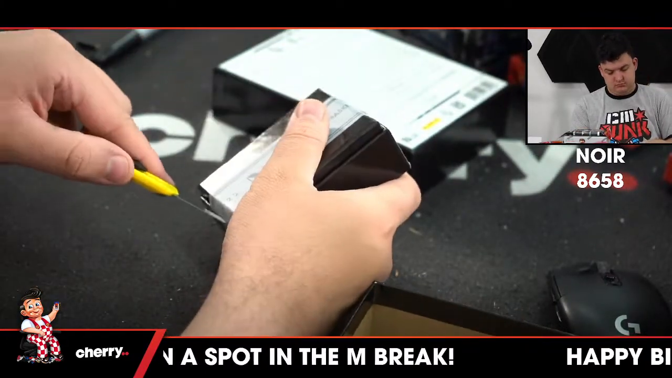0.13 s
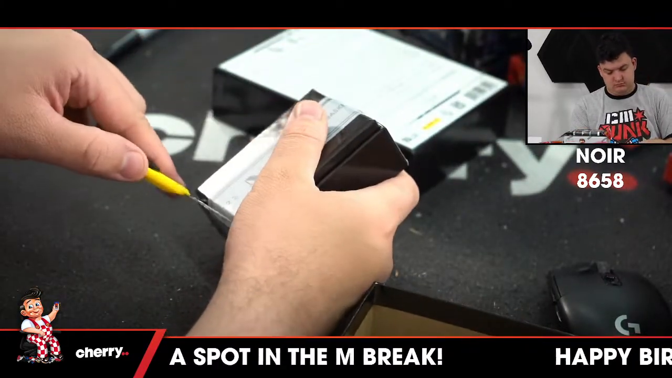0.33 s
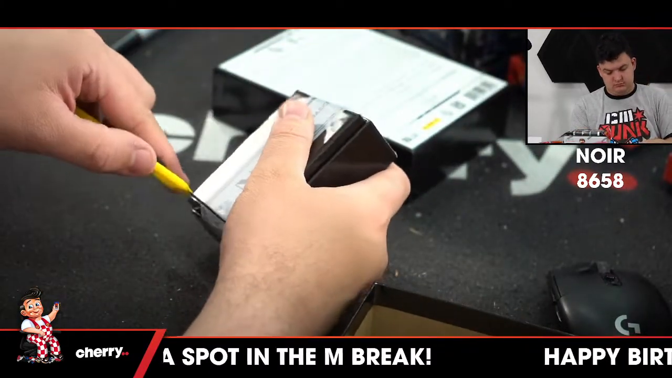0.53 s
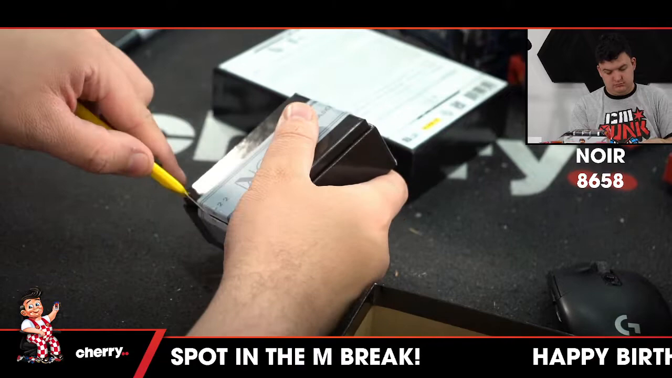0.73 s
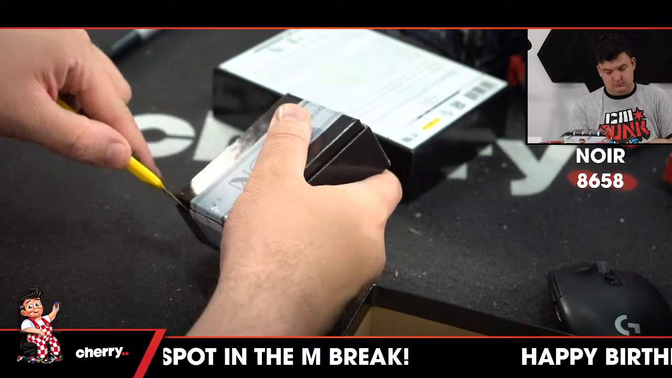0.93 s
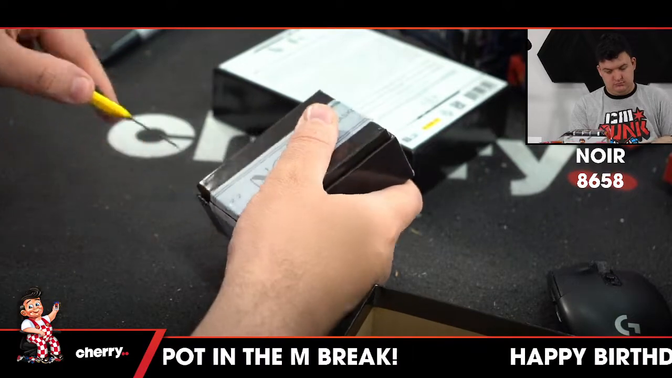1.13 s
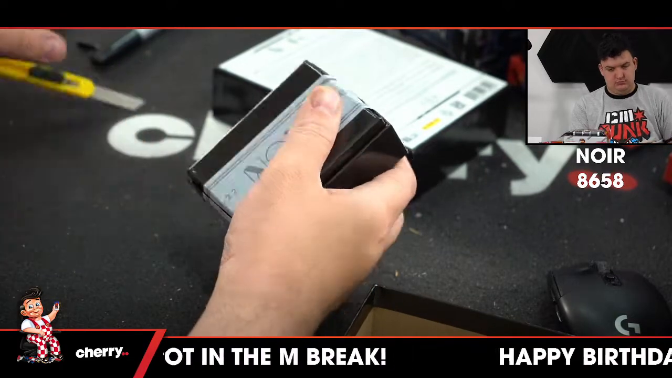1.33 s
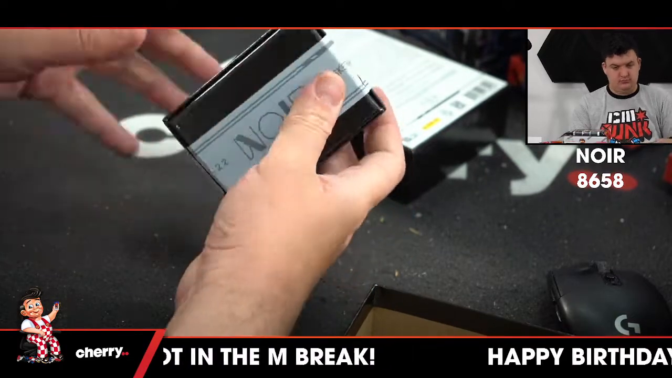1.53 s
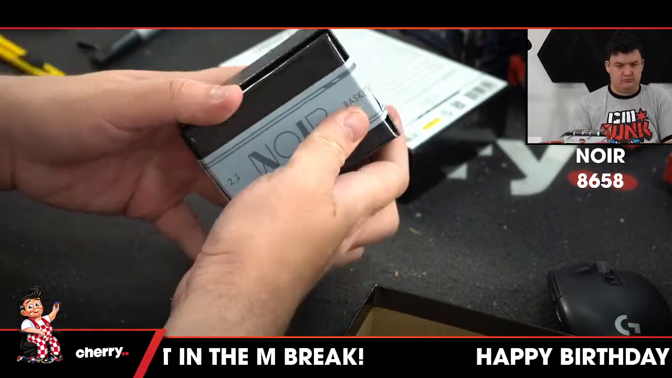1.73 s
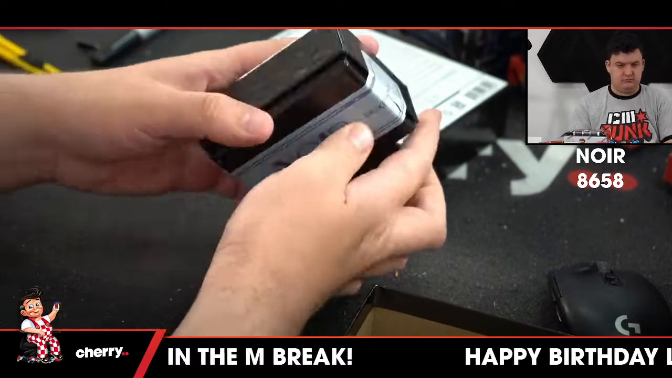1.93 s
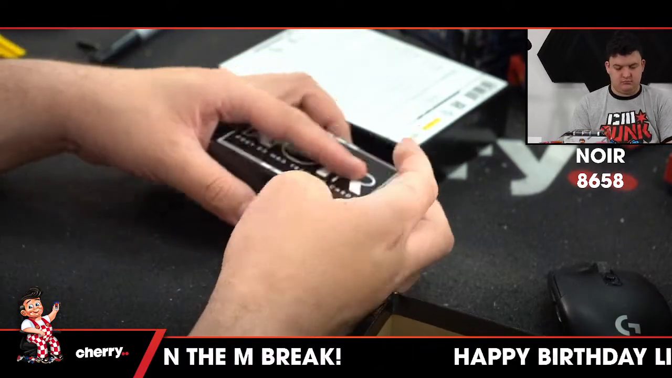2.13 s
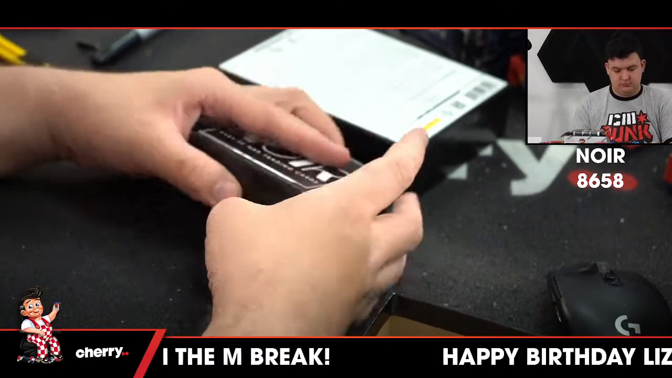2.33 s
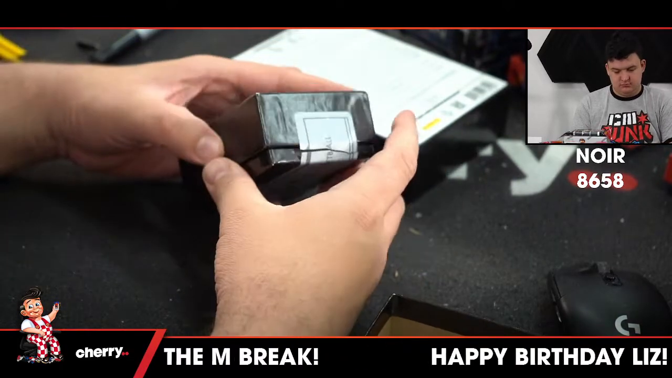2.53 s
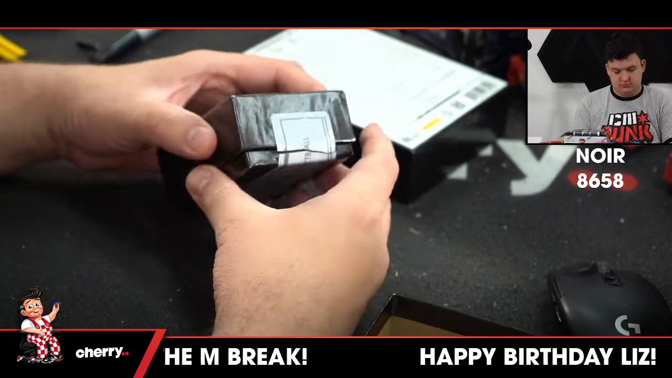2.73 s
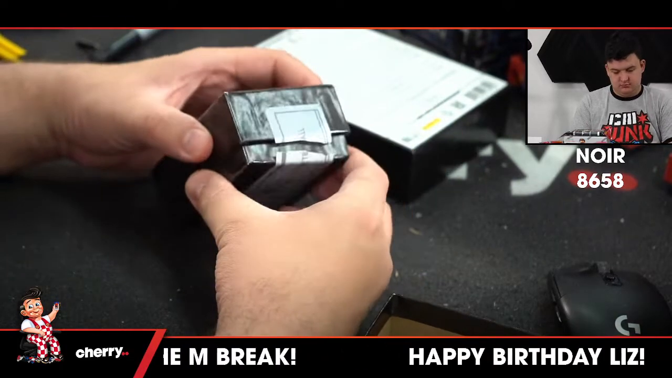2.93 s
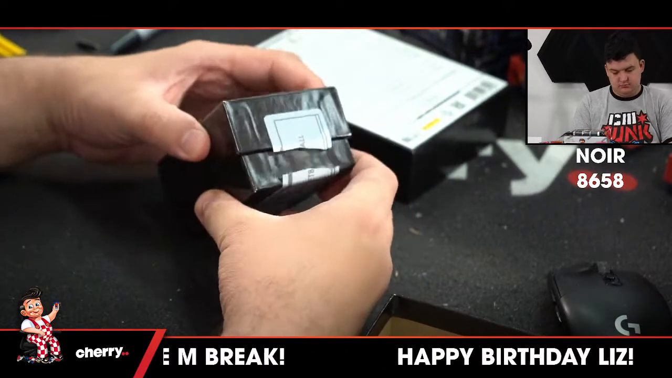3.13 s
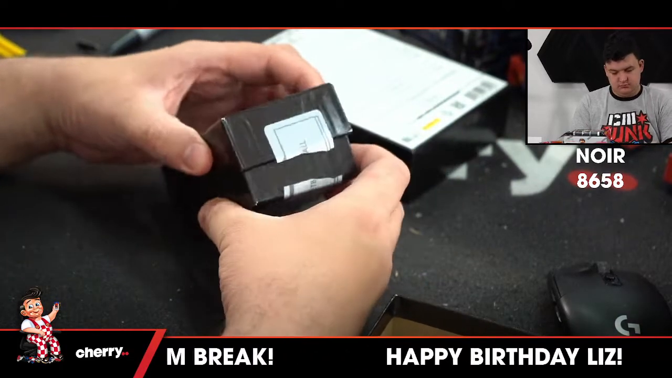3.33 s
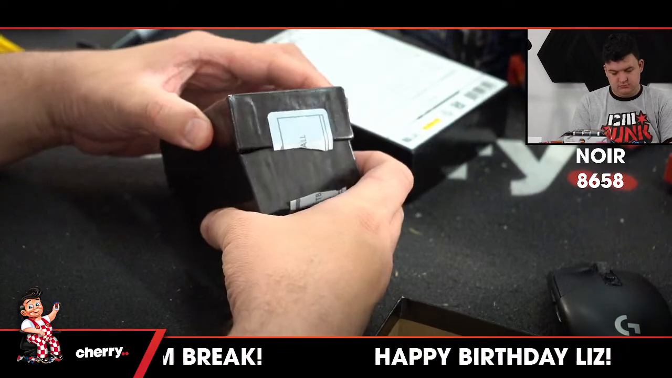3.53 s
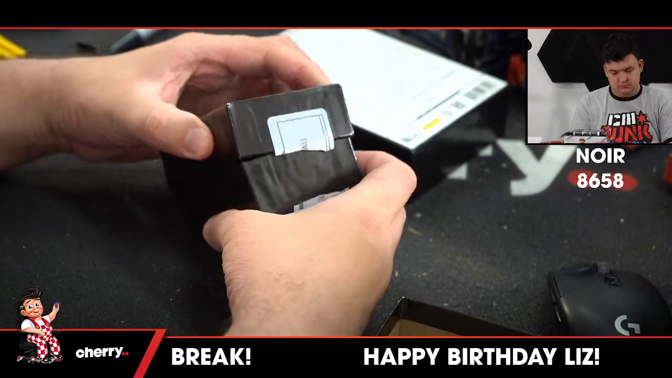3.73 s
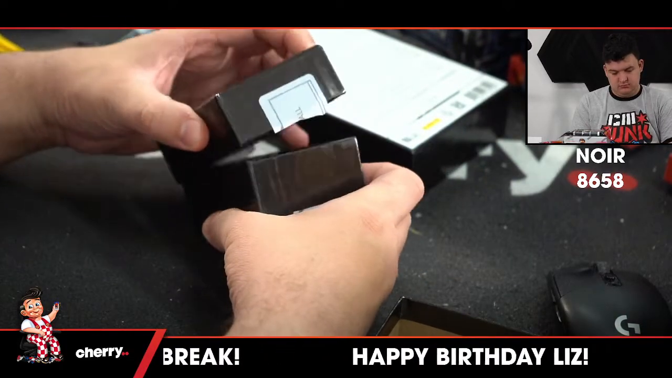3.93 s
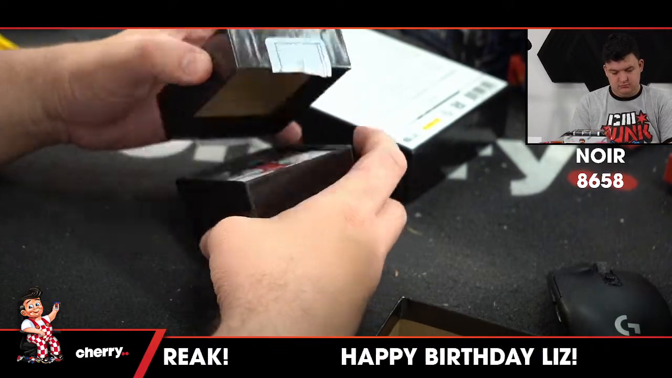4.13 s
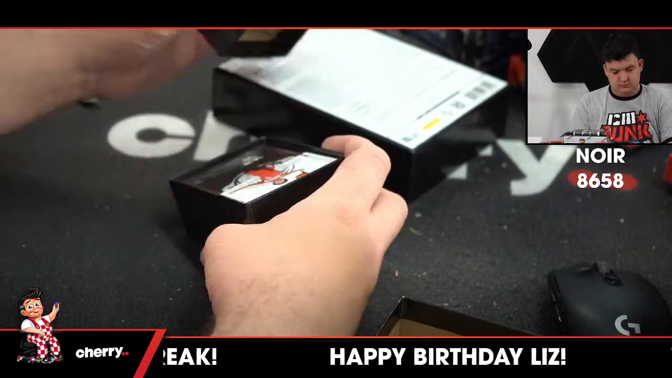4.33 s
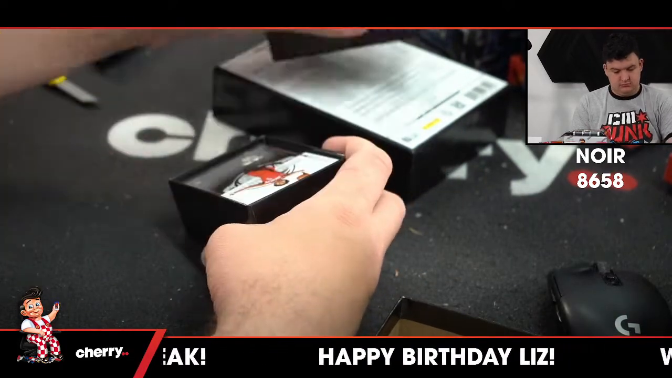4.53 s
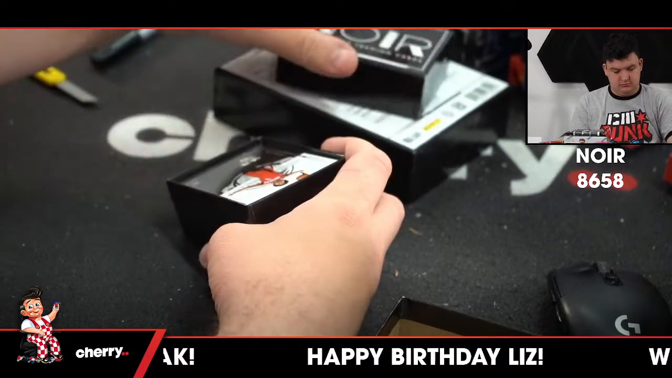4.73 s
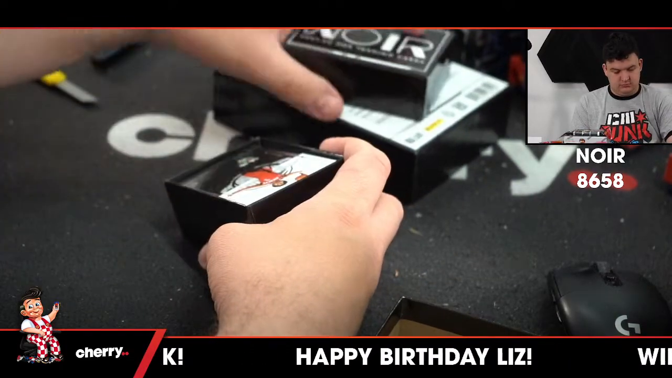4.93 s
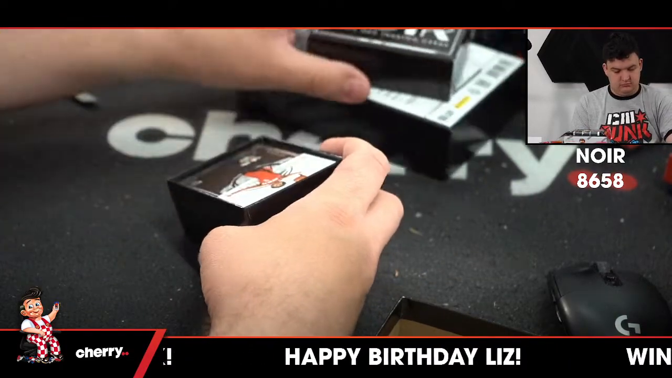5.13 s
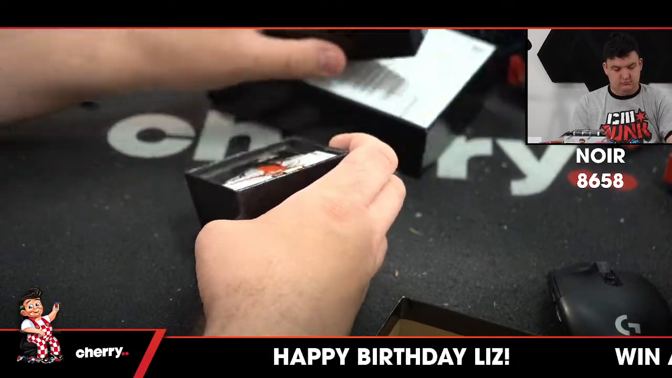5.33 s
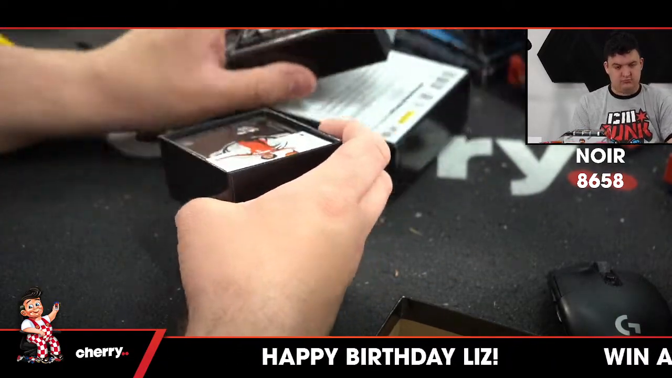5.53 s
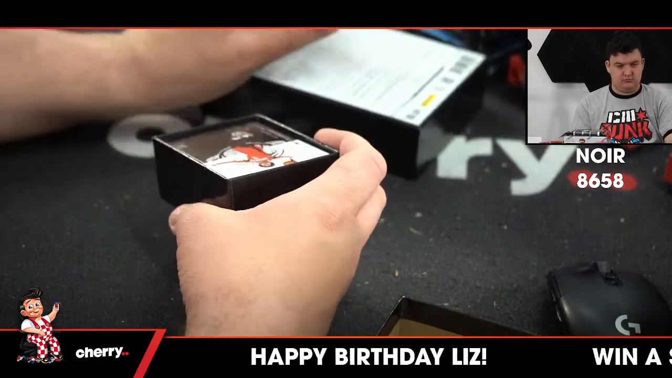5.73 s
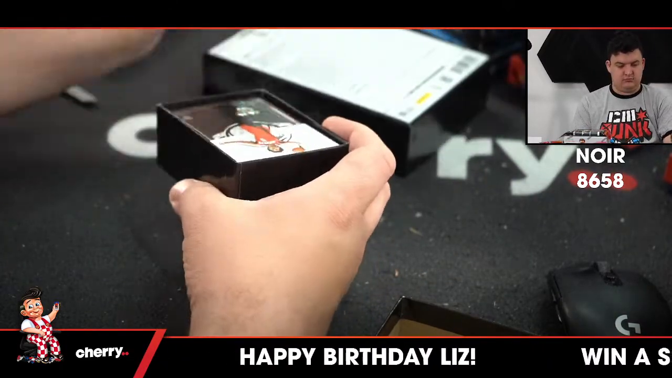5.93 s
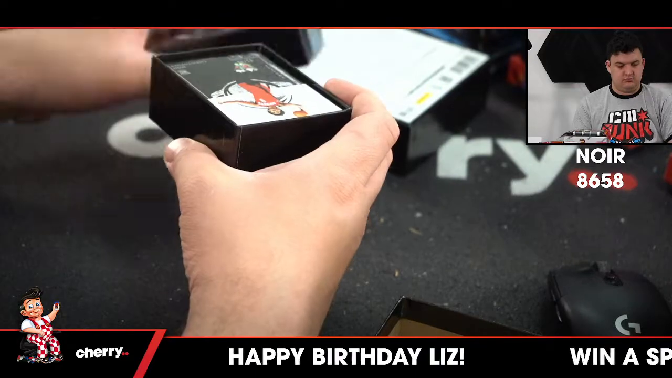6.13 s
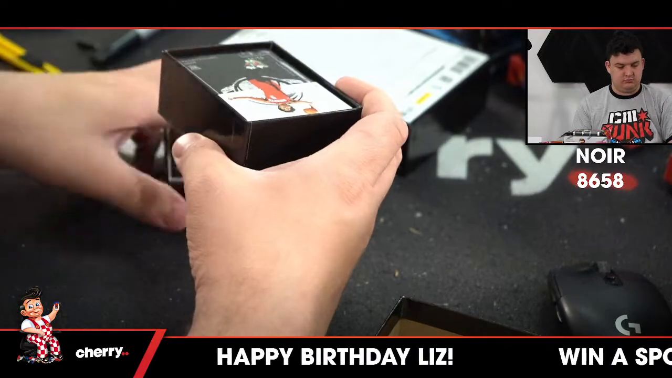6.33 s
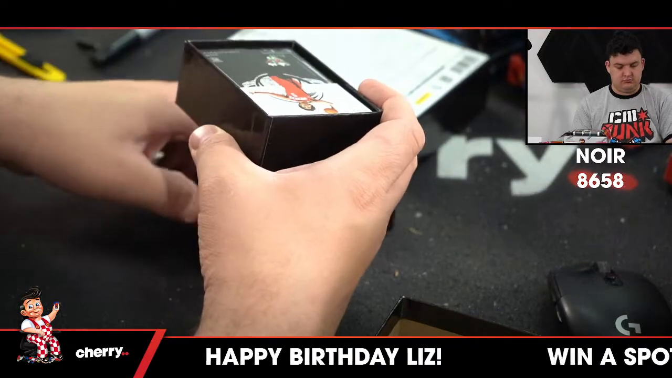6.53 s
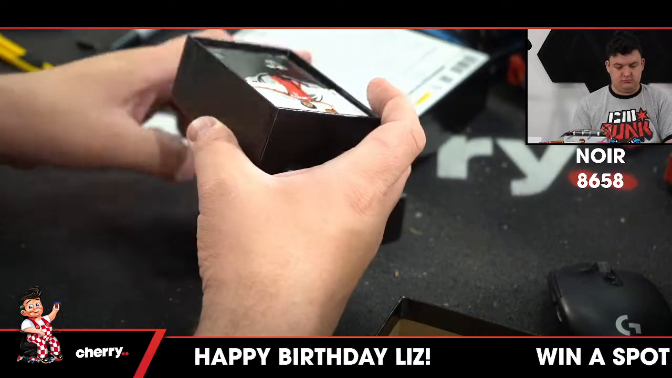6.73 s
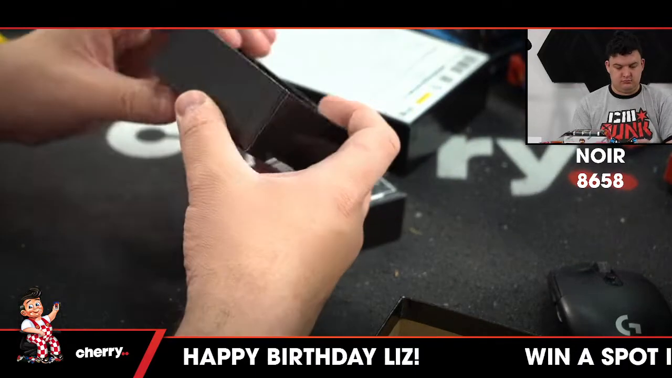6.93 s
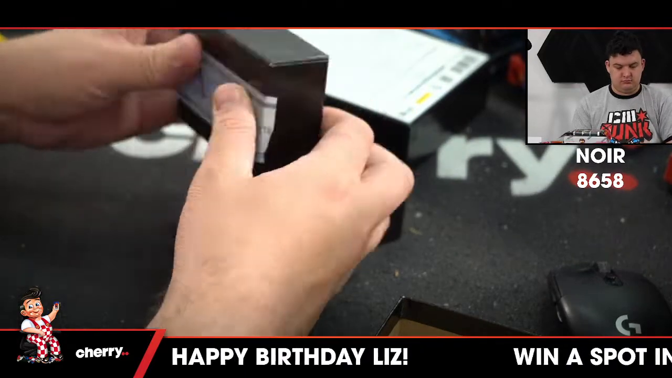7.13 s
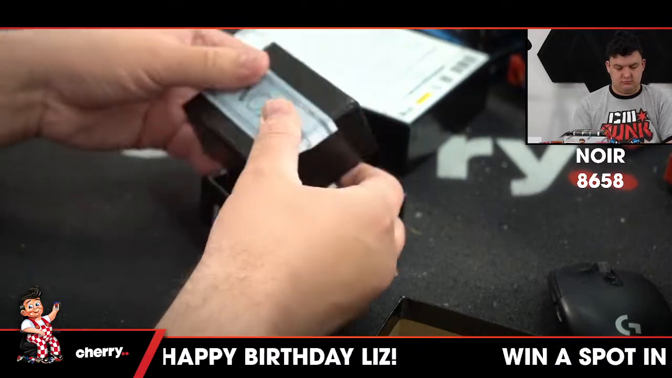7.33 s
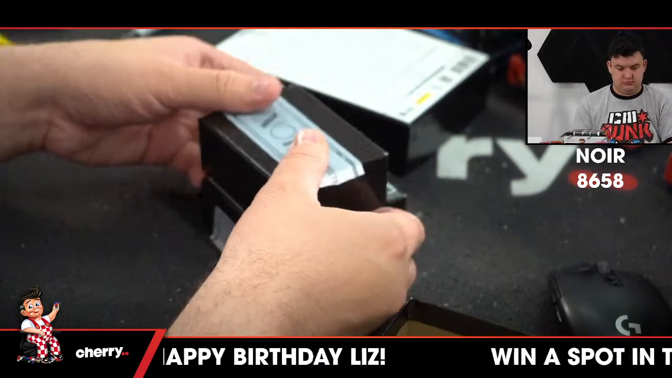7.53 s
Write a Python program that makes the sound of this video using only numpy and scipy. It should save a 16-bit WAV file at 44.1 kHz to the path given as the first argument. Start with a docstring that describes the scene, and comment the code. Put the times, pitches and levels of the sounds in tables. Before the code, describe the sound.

A cutter slits a seal and rattles down, then a stiff cardboard lid rubs off and knocks about over a steady fan.

```python
"""Over a running fan, a cutter slits the seal of a stiff card box, then rattles down on a desk mat.
The box is turned, its lid worked off in short rubs, set on a hollow carton, dragged and knocked about
there, then put on the mat. Rubs are dense fibre slips; blows are a contact crack plus damped modes.
A two-port microphone some way off hears it all through a bare, ringing room."""
import sys
import numpy as np
from scipy import signal
from scipy.fft import rfft, irfft
from scipy.io import wavfile

SR = 44100
rng = np.random.default_rng(int(sys.argv[2]) if len(sys.argv) > 2 else 0)


def pcm_store(signal):
    """Save signal as 16-bit PCM."""
    levels = np.round(np.clip(np.atleast_2d(signal), -1, 1) * 32767)
    wavfile.write(sys.argv[1], SR, levels.astype(np.int16).T)


N = 335020
TIME_S = np.arange(N) / SR
FREQS_HZ = np.fft.rfftfreq(N, 1 / SR)
RING_S = TIME_S[:SR // 2]

# fan air noise: freq_hz, level_db
FAN_SPECTRUM = [(20, -13.5), (60, -4), (170, 1), (330, -4), (520, -8), (720, -2.5), (1000, -10.5),
                (1350, -6), (1800, -26), (2500, -36), (5000, -35), (9000, -30.5), (12000, -35.5),
                (16000, -39)]
# fan hum: pitch_hz, width_hz, level_db
FAN_HUM = [(46, 6.7, -77), (82.55, 1.95, -73.5)]
# room reverberation: freq_hz, t60_s, wet_db
ROOM_BANDS = [(102, 0.96, -4.5), (302, 0.66, 0.5), (814, 0.56, 6), (1920, 0.5, 2.5), (4770, 0.43, -4.5),
              (9000, 0.34, -5.5), (15000, 0.22, -6)]

# contact and friction spectra: freq_hz, level_db
BLADE_SPECTRUM = [(800, -7), (1800, -10), (2700, -9.5), (3700, -4.5), (4500, 1), (5300, -1), (7000, -6),
                  (9300, -2.5), (12000, -10), (16000, -33)]
RATTLE_SPECTRUM = [(800, -41), (1800, -19.5), (2700, -14.5), (4000, -7.5), (5300, 2), (6700, -2), (9500, 0),
                   (12000, -9), (16000, -14)]
CARD_CRACK_SPECTRUM = [(40, -13), (150, -10), (500, -3.5), (1200, 1.5), (2000, 2), (2500, -0.5),
                       (3400, 3.5), (5000, 5.5), (7000, 1.5), (10500, 1), (16000, -8)]
CARD_HISS_SPECTRUM = [(600, 8.5), (1500, -3.5), (2500, -3), (3600, 1.5), (4600, 3.5), (6000, 2),
                      (9500, -2.5), (12000, -11), (16000, -25)]
CARD_PANEL_SPECTRUM = [(80, -23), (200, 6), (320, 9.5), (500, -0.5), (800, -6), (1400, -4.5), (2200, -15.5),
                       (5000, -27)]

# resonances: pitch_hz, level_db, t60_s
CUTTER_MODES = [(175, -11, 0.019), (310, -5.5, 0.12), (476, -1, 0.046), (650, -3, 0.034),
                (875, -8.5, 0.035), (1280, -9, 0.0091)]
STEEL_MODES = [(4540, -7, .2), (5500, 0, .047), (6360, 0, .057), (6760, 2, .08), (8500, -2, .057),
               (10500, -2, .03)]
BOX_MODES = [(96, -5, 0.12), (158, 0.5, 0.073), (221, -2.5, 0.02), (485, -16, 0.016), (1010, -18.5, 0.0017)]
CARTON_MODES = [(256, -1.5, 0.021), (326.5, -2.5, 0.11), (363.2, -5.5, 0.39), (466, 2, 0.021),
                (577, 1.5, 0.057), (624, -4, 0.053), (788, 3.5, 0.018), (799, 1.5, 0.085),
                (854, -4.5, 0.077), (960, -1, 0.16), (1063, 0, 0.082), (1140, -1, 0.023), (1397, -1, 0.031),
                (1472, 1.5, 0.12), (1692, 6, 0.017), (1804, -18.5, 0.069), (1890, -2, 0.014),
                (1960, 5, 0.053), (2790, -21, 0.041)]
LID_MODES = [(125, -15, 0.12), (222, -5.5, 0.041), (327, -3, 0.051), (460, -4.5, 0.025),
             (543.4, -5.5, 0.03), (697, -10, 0.025), (1026, -18, 0.013), (1220, -23, 0.02)]

# fingers shift on the box: start_s, length_s, hiss_db, panel_db
FINGER_STROKES = [(.9, 0.33, -77, -88), (1.8, 0.15, -75.5, -95), (1.96, 0.32, -74.5, -75),
                  (2.38, 0.42, -78.5, -96), (4.32, .22, -78.5, -82), (6.12, 0.24, -80.5, -76),
                  (6.9, 0.34, -81, -92), (7.2, 0.41, -76.5, -90)]
# card hisses as the seal is slit and later as the lid rubs: start_s, length_s, hiss_db, panel_db
CARD_STROKES = [(.785, 0.12, -61, -85), (5.03, 0.29, -66.5, -61.5), (5.31, 0.18, -71.5, -72),
                (5.45, 0.13, -64.5, -66.5), (6.29, 0.25, -63, -87), (6.47, 0.26, -63.5, -74)]
# the cutter scrapes the seal, then the mat as it lands: start_s, length_s, hiss_db, panel_db
CUTTER_SCRAPES = [(.505, 0.067, -76, -90), (.768, 0.06, -57, -88), (1.392, 0.06, -59, -67),
                  (1.68, 0.21, -73.5, -79)]
# ticks of blade, seal and fingernails: start_s, level_db, t60_s
TICKS = [(.525, -41, .028), (0.772, -32.5, 0.025), (0.79, -37, 0.022), (0.938, -40.5, 0.0096),
         (1.1055, -43.5, .034), (1.138, -46, .023), (3.051, -47, 0.052), (3.279, -44.5, 0.065),
         (3.8715, -44.5, .015), (4.178, -37.5, 0.038), (5.217, -47, .008), (5.9547, -40.5, 0.048),
         (6.0572, -49, 0.0087), (6.6413, -36.5, .016), (7.55, -44.5, 0.016)]
# short card rubs, each with a soft knock: knock_s, knock_db, rub_db
SHORT_RUBS = [(2.892, -32, -68.5), (3.127, -31.5, -78), (3.432, -31, -73), (3.894, -30.5, -70),
              (7.563, -38.5, -82)]
# the bent blade springs back: start_s, level_db
BLADE_PINGS = [(.7725, -42), (1.1367, -45)]
# the cutter tumbles on the mat: start_s, landing_db, tip_click_db
CUTTER_DROP = [(1.4048, -35, -25.5), (1.4345, -11.5, -33), (1.4398, -19, -23), (1.448, -21, -18),
               (1.5336, -42, -21), (1.5626, -16, -35), (1.5664, -33, -24), (1.6225, -25, -24.5),
               (1.665, -35, -30)]
# blows, higher top = harder contact: start_s, thud_db, crack_db, top_hz
BOX_BUMP = [(2.198, -11, -36, 1600)]
LID_ON_CARTON = [(4.654, -27, -31, 5000), (4.658, -16, -12, 3900), (4.6628, -21, -6.5, 2350),
                 (4.6662, -2, -11, 1250), (5.5662, -13, -12, 9500), (5.6697, -20, -11.5, 15100),
                 (5.6725, -8.5, -8, 14000), (5.6787, -9, -7, 10000), (5.6851, -17, -15, 9000),
                 (5.692, -25, -12.5, 9700), (5.6993, -23, -32, 7000)]
LID_THUMPS = [(5.166, -25.5, -34.5, 9000), (5.181, -22.5, -36, 1500), (6.2965, -8, -34, 4030),
              (6.315, -17, -33, 4000), (6.334, -16, -33, 4000), (6.353, -17, -36, 7000),
              (6.3622, -20, -30, 6660)]

# phase between the microphone ports: freq_hz, left_lead_rad
PORT_PHASE = [(100, .02), (250, .13), (500, .23), (1000, .34), (2000, .42), (6500, .53), (9500, .22),
              (14000, .35)]
# part the ports do not share: freq_hz, gain_db
PORT_SIDE = [(100, -32), (500, -24), (1000, -19), (2000, -14), (4000, -12.5), (9000, -9.5), (14000, -7)]
# slightly duller left port: freq_hz, gain_db
PORT_SHADE = [(150, 0.12), (1000, -0.6), (12000, -0.62)]
# electrical hiss: freq_hz, level_db
SELF_NOISE_SPECTRUM = [(100, 7.5), (1000, 16), (2500, 8), (5000, 2), (7000, 1.5), (9000, -54), (16000, -24)]


def undb(db):
    """Decibels to gain."""
    return 10 ** (np.asarray(db) / 20)


def across(points, hz):
    """Interpolate (freq_hz, value) points over log frequency."""
    point_hz, value = np.transpose(points)
    return np.interp(np.log(hz + 1e-3), np.log(point_hz), value)


def unit(x):
    """Scale to unit energy."""
    return x / np.sqrt(np.sum(x ** 2))


def decay(time_s, t60_s):
    """Envelope falling 60 dB in t60_s."""
    return np.exp(-np.log(1000) * time_s / t60_s)


def colour(x, spectrum):
    """Filter a full-length signal; unit rms."""
    y = irfft(rfft(x) * undb(across(spectrum, FREQS_HZ)), N)
    return y / np.std(y)


def add(track, start_s, sound):
    """Mix a sound in at start_s."""
    i = int(start_s * SR)
    track[i:i + len(sound)] += sound[:N - i]


def fan(air_db=-63.5):
    """Steady air noise over a wavering low hum; mid and side."""
    air = np.array([colour(rng.standard_normal(N), FAN_SPECTRUM) for _ in range(2)]) * undb(air_db)
    for pitch_hz, width_hz, level_db in FAN_HUM:
        detune = 2 * (FREQS_HZ - pitch_hz) / width_hz
        hum = irfft(rfft(rng.standard_normal(N)) / (1 + detune ** 2), N)
        air[0] += undb(level_db) * hum / np.std(hum)
    return air


def reflections(delay_s=0.003, build_s=0.01):
    """Dense mid and side wall reflections; treble dies first."""
    bands_hz, t60s_s, wets_db = np.transpose(ROOM_BANDS)
    time_s = TIME_S[:SR]
    bins_hz = np.fft.rfftfreq(SR, 1 / SR)
    noise = rfft(rng.standard_normal((2, SR)))
    onset = np.clip((time_s - delay_s) / build_s, 0, 1)
    tail = 0
    for share, t60_s, wet_db in zip(np.eye(len(bands_hz)), t60s_s, wets_db):
        band = irfft(noise * across(np.c_[bands_hz, share], bins_hz), SR)
        tail += undb(wet_db) * band * unit(onset * decay(time_s, t60_s))
    return tail


def room(direct, sway_hz=1.25):
    """Direct sound plus two reflection patterns that alternate as the hands move; mid and side."""
    sway_rad = 2 * np.pi * TIME_S * sway_hz
    out = np.zeros((2, N))
    for weight in (np.cos(sway_rad), np.sin(sway_rad)):
        out += signal.fftconvolve([direct * weight], reflections(), axes=1)[:, :N]
    out[0] += direct
    return out


def friction(strokes, spectrum, rise_share, fall_share, slips_per_s, scatter_db):
    """Fibres catch and let go in uneven slips that hiss at the edge and drum on the panels."""
    hiss_gain, panel_gain = np.zeros(N), np.zeros(N)
    for start_s, length_s, hiss_db, panel_db in strokes:
        progress = (TIME_S - start_s) / length_s
        speed = np.clip(np.minimum(progress / rise_share, (1 - progress) / fall_share), 0, 1)
        hiss_gain += undb(hiss_db) * speed
        panel_gain += undb(panel_db) * speed
    sizes = undb(scatter_db * np.minimum(rng.exponential(size=N), 5))
    slipping = rng.random(N) < slips_per_s / SR
    slips = slipping * sizes * rng.choice([-1, 1], N)
    return hiss_gain * colour(slips, spectrum) + panel_gain * colour(slips, CARD_PANEL_SPECTRUM)


def crack(spectrum, top_hz, t60_s, size=8192):
    """Contact: a short noise burst through a causal filter, duller for a softer touch."""
    bins_hz = np.fft.rfftfreq(size, 1 / SR)
    magnitude = undb(across(spectrum, bins_hz)) / np.sqrt(1 + (bins_hz / top_hz) ** 4)
    cepstrum = irfft(np.log(magnitude))
    cepstrum[1:size // 2] *= 2  # fold to minimum phase
    cepstrum[size // 2 + 1:] = 0
    burst = rfft(rng.standard_normal(size) * decay(RING_S[:size], t60_s))
    burst /= np.abs(burst) ** 0.7  # partly whiten
    return unit(irfft(burst * np.exp(rfft(cepstrum)))[:size // 2])


def thud(modes, tilt_db_per_oct):
    """Struck body: damped modes of alternating sign, radiating little below the lowest."""
    out = 0
    for k, (pitch_hz, level_db, t60_s) in enumerate(modes):
        detune = 1 + 0.0049 * rng.standard_normal()  # finger grip
        ring = np.sin(2 * np.pi * pitch_hz * detune * RING_S) * decay(RING_S, t60_s)
        out += (-1) ** k * undb(level_db + tilt_db_per_oct * np.log2(pitch_hz)) * unit(ring)
    low_cut = signal.butter(3, modes[0][0] * 0.74, "high", fs=SR, output="sos")
    return unit(signal.sosfilt(low_cut, out))


def fingers(grip_rate_hz=10, grip_sway_db=0.5):
    """Skin brushes the card with wandering pressure."""
    grip = np.interp(TIME_S * grip_rate_hz, np.arange(N), rng.standard_normal(N))
    brush = friction(FINGER_STROKES, CARD_HISS_SPECTRUM, rise_share=0.084, fall_share=0.24,
                     slips_per_s=1200, scatter_db=1)
    return undb(grip_sway_db * grip) * brush


def ticks():
    """Contacts too light to move a panel."""
    out = np.zeros(N)
    for start_s, level_db, t60_s in TICKS:
        add(out, start_s, undb(level_db) * crack(BLADE_SPECTRUM, top_hz=10800, t60_s=t60_s))
    return out


def card_rubbing(lead_s=0.019, rub_s=0.063, panel_over_hiss_db=3.5):
    """Card hisses in longer strokes and in short rubs; each short rub has a soft knock."""
    rubs = [(knock_s - lead_s, rub_s, rub_db, rub_db + panel_over_hiss_db)
            for knock_s, _, rub_db in SHORT_RUBS]
    out = friction(CARD_STROKES + rubs, CARD_HISS_SPECTRUM, rise_share=0.26, fall_share=0.41,
                   slips_per_s=4000, scatter_db=2)
    for knock_s, knock_db, _ in SHORT_RUBS:
        add(out, knock_s, undb(knock_db) * thud(LID_MODES, tilt_db_per_oct=6.5))
    return out


def cutter(top_hz=14000, rattle_over_landing_db=1.5, steel_db=-11):
    """The cutter scrapes the seal, springs free, then scrapes and rattles on the mat; its steel rings."""
    contacts = friction(CUTTER_SCRAPES, BLADE_SPECTRUM, rise_share=0.11, fall_share=0.55,
                        slips_per_s=2900, scatter_db=1)
    for start_s, landing_db, tip_click_db in CUTTER_DROP:
        rattle_db = landing_db + rattle_over_landing_db
        add(contacts, start_s, undb(landing_db) * thud(CUTTER_MODES, tilt_db_per_oct=-2.5))
        add(contacts, start_s, undb(rattle_db) * crack(RATTLE_SPECTRUM, top_hz, t60_s=0.1))
        add(contacts, start_s, undb(tip_click_db) * crack(RATTLE_SPECTRUM, top_hz, t60_s=0.015))
    steel = undb(steel_db) * signal.fftconvolve(contacts, thud(STEEL_MODES, 0))[:N]
    for start_s, level_db in BLADE_PINGS:
        add(steel, start_s, undb(level_db) * thud(STEEL_MODES[:1], 0))  # bending: lowest mode only
    return contacts + steel


def blows(hits, modes, hard_tilt_db_per_oct, hard_t60_s, hard_hz=10000):
    """Each blow cracks and rings the card; a softer contact lasts longer and favours low modes."""
    out = np.zeros(N)
    for start_s, thud_db, crack_db, top_hz in hits:
        softness_oct = np.log2(hard_hz / top_hz)
        tilt_db_per_oct = hard_tilt_db_per_oct - 1.05 * softness_oct
        t60_s = hard_t60_s * 2 ** (0.64 * softness_oct)
        add(out, start_s, undb(thud_db) * thud(modes, tilt_db_per_oct))
        add(out, start_s, undb(crack_db) * crack(CARD_CRACK_SPECTRUM, top_hz, t60_s))
    return out


def box():
    """The box bumps the mat; its lid knocks the carton, thumps when dragged and settles on the mat."""
    bump = blows(BOX_BUMP, BOX_MODES, hard_tilt_db_per_oct=4, hard_t60_s=0.0079)
    knocks = blows(LID_ON_CARTON, CARTON_MODES, hard_tilt_db_per_oct=-3, hard_t60_s=0.013)
    thumps = blows(LID_THUMPS, LID_MODES, hard_tilt_db_per_oct=1.5, hard_t60_s=0.039)
    return bump + knocks + thumps


def scene():
    """Handling and fan in the room, at two closely spaced ports."""
    handling = cutter() + box() + card_rubbing() + fingers() + ticks()
    mid, side = room(handling) + fan()
    side = irfft(rfft(side) * undb(across(PORT_SIDE, FREQS_HZ)), N)
    half_lead = np.exp(0.5j * across(PORT_PHASE, FREQS_HZ))
    shade = undb(across(PORT_SHADE, FREQS_HZ))
    left = irfft(rfft(mid + side) * half_lead * shade, N)
    right = irfft(rfft(mid - side) / half_lead, N)
    return np.array([left, right])


def record(dry, hiss_db=-74, top_hz=15800):
    """Independent faint hiss per channel, then a steep low-pass."""
    hiss = undb(hiss_db) * np.array([colour(rng.standard_normal(N), SELF_NOISE_SPECTRUM) for _ in dry])
    low_pass = signal.ellip(10, 0.2, 70, top_hz, fs=SR, output="sos")
    return signal.sosfilt(low_pass, dry + hiss)


dry = scene()
out = record(dry)
pcm_store(out)
```